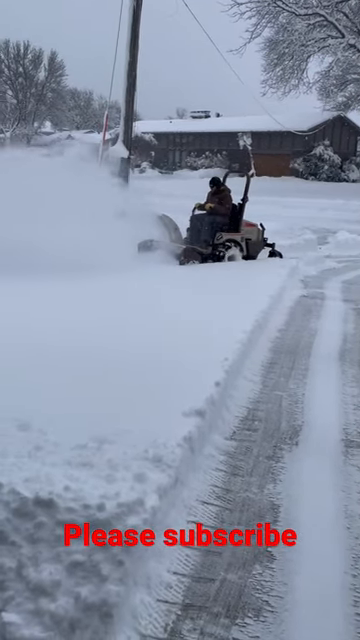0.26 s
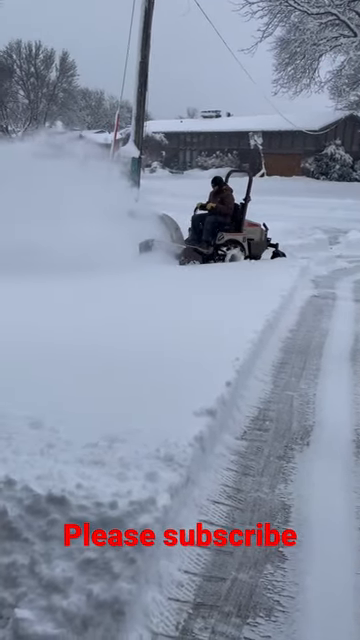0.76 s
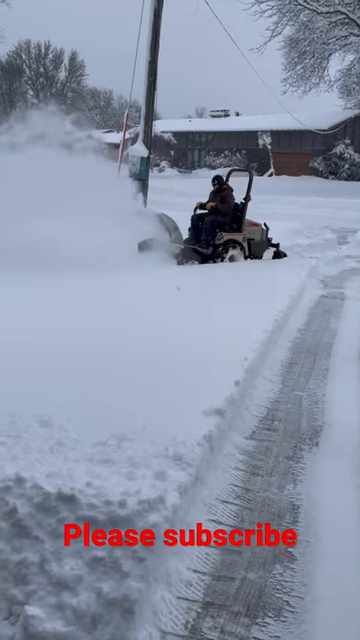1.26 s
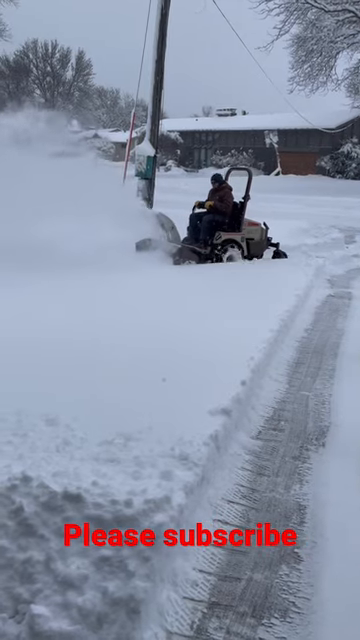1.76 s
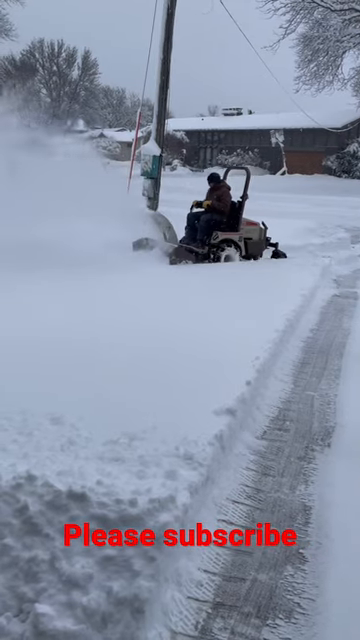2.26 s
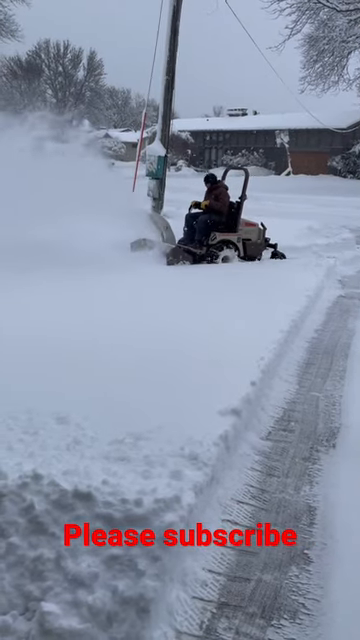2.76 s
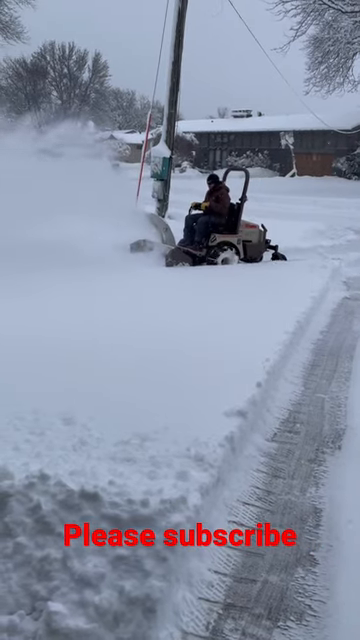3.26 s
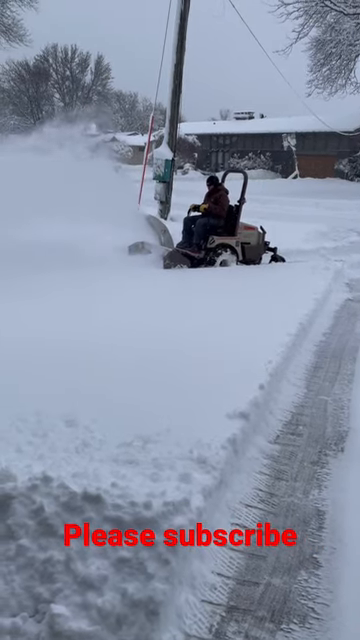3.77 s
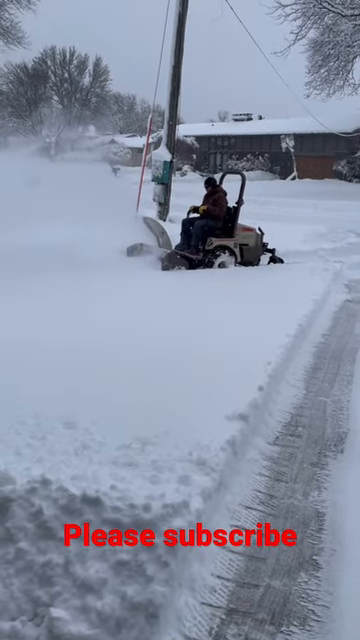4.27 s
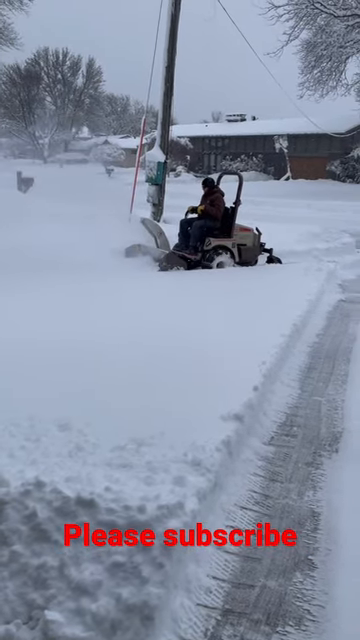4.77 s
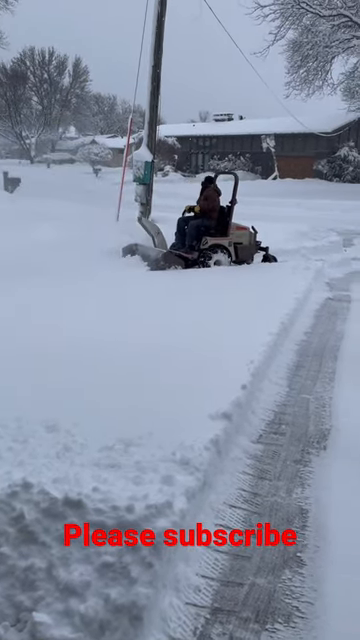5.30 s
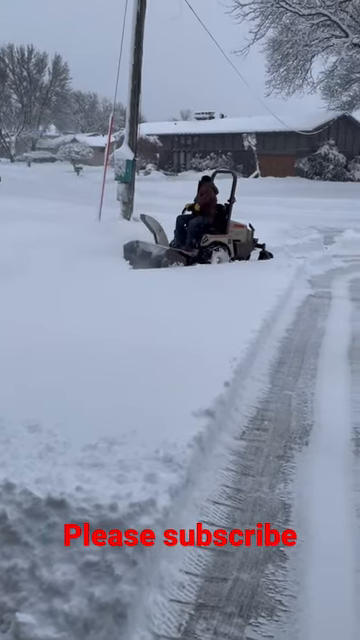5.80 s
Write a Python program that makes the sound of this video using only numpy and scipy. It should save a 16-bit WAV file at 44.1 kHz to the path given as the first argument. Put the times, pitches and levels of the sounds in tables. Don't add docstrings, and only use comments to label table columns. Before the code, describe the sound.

Continuous low diesel drone with fan hum and clatter, heard across an open snowy yard on a phone. At first there is a dense snow rush, gear whine and bright metallic ice rattle with irregular clinks. A throbbing low beat swells midway. After nearly four seconds the load falls off, leaving a cleaner, slightly higher engine hum, one tiny tick, and a faint returning hiss.

```python
import sys
import numpy as np
from scipy import signal
from scipy.fft import rfft, irfft, next_fast_len
from scipy.io import wavfile
from scipy.ndimage import uniform_filter1d

SR = 44100
rng = np.random.default_rng(int(sys.argv[2]) if len(sys.argv) > 2 else 0)


def linear_from_db(decibels):
    return 10 ** (np.asarray(decibels, float) / 20)


def transcribe(u):
    v = np.clip(np.atleast_2d(u).T, -1, 1)
    q = np.round(v * 32767).astype(np.int16)
    wavfile.write(sys.argv[1], SR, q)


N = 266364

# (time [s], load [0-1])
SNOW_LOAD = [
    (0, 1),
    (1, 0.93),
    (1.6, 0.89),
    (2.5, 0.98),
    (3, 0.71),
    (3.6, 0.98),
    (4.3, 0.18),
    (5.5, 0.18),
    (6.04, 0.44),
]
# (time [s], chute rattle level [dB])
ICE_RATTLE = [
    (0, -37),
    (.5, -37.5),
    (1.5, -41),
    (2.5, -40.5),
    (3.4, -41),
    (3.9, -39),
    (4.3, -62),
    (5, -71),
    (6.04, -53),
]
# (time [s], turned away [0-1])
HEADING = [
    (0, 0),
    (1.8, 0.14),
    (3.6, 0.62),
    (5.15, 0.83),
    (5.7, 0.25),
    (6.04, 0),
]
# (time [s], engine cycles [Hz])
ENGINE_SPEED = [(0, 29.15), (.6, 29.156), (.9, 29.133), (1.8, 29.131), (2.4, 29.17), (3, 29.285),
                (3.6, 29.29), (3.9, 29.6), (4.2, 29.73), (4.8, 29.66), (6.04, 29.58)]
# (time [s], impeller turns per engine cycle [ratio])
IMPELLER_RATIO = [
    (2.6, .6276),
    (3, .6288),
]
# (multiple of engine cycle [ratio], loaded level [dB], free level [dB])
ENGINE_ORDERS = [(1.996, -47, -63), (3, -27, -23), (4.01, -43, -43), (4.79, -49.5, -44.5), (6, -35, -39),
                 (7.02, -47.5, -57.5), (9.01, -45, -50), (11, -63, -62.5), (11.94, -43, -35.5),
                 (13.31, -44.5, -95), (13.92, -60, -53), (15.02, -48.5, -44), (16.23, -57, -34.5),
                 (17.98, -44.5, -61), (19.47, -49, -53), (20, -59, -52), (21.16, -43, -42.5),
                 (21.81, -38, -41.5), (23.13, -44, -51), (24.13, -47.5, -38.5), (25.1, -51.5, -49.5),
                 (26.7, -45, -75), (27.55, -42, -50.5), (29.4, -50, -39), (32.16, -43.5, -52.5),
                 (32.73, -66, -36), (40.07, -48.5, -47), (40.26, -59, -51), (70.4, -46.5, -55),
                 (84.4, -44.5, -53)]
# (multiple of impeller turn [ratio], loaded level [dB])
IMPELLER_ORDERS = [(3, -46), (4, -31), (5, -42), (6, -46), (8, -46.5), (10, -42), (11, -46), (12, -45),
                   (15, -50), (16, -53), (18, -45), (19, -46), (20, -43), (21, -42), (22, -41), (23, -43),
                   (24, -47), (25, -41), (26, -44), (27, -41), (28, -42), (34, -49), (60, -45), (90, -45)]
# (multiple of impeller turn [ratio], level around the ring [dB])
HOUSING_ORDERS = [(29, -14), (30, 1.5), (31, -3.5), (32, -10.5), (33, -17)]
# (multiple of fan turn [ratio], loaded level [dB], free level [dB])
FAN_ORDERS = [(2, -51, -59), (3, -47.5, -44), (4, -86, -47), (5, -41, -34), (7, -43, -38), (9, -54, -47),
              (10, -43, -41.5), (16, -44, -57)]
# (frequency [Hz], density [dB per Hz])
CLATTER_SPECTRUM = [(30, -79), (55, -55), (100, -60), (200, -73.5), (290, -72), (480, -59.5), (1200, -62),
                    (2100, -68.5), (2600, -67), (3400, -73.5), (3650, -76.5), (9800, -82.5), (12700, -95.5),
                    (15200, -95)]
# (frequency [Hz], density [dB per Hz])
RUSH_SPECTRUM = [(30, -86), (70, -52.5), (160, -59.5), (260, -70.5), (500, -64.5), (800, -64),
                 (1500, -82.5), (2500, -74.5), (3650, -86), (6000, -79), (9500, -82.5), (12700, -100),
                 (15300, -99)]
# (frequency [Hz], width [Hz], level [dB])
CHUTE_MODES = [(1637, 55, 1.5), (2555, 170, 3), (2666, 200, -4), (3308, 42, -0.5), (4435, 92, 0.5),
               (5980, 300, 0.5), (7840, 240, -26)]
# (frequency [Hz], width [Hz], level over rattle [dB], rise in packed snow [dB])
RING_MODES = [(4230, 54, 1.5, -5), (4995, 44, -1, -4), (5450, 82, -2, 7), (5726, 30, -1, 4)]
# (time [s], peak level [dB], place on the chute [-1 low to 1 high])
CLINKS = [(0.0268, -28, 0.66), (0.0882, -30, -1.3), (0.1521, -22.5, -.8), (0.2628, -42, -1),
          (0.2853, -40, -0.56), (0.4943, -27, .5), (0.5192, -30, .6), (0.5646, -36, .3), (0.6494, -29, 0),
          (0.7023, -19, -0.58), (0.7312, -25, -.2), (0.8086, -47, -1), (0.8455, -39, -.9),
          (0.9313, -26, -0.077), (1.2575, -48, -0.78), (2.0497, -35, -0.95), (2.2712, -32, -.4),
          (2.5346, -34, -.5), (2.6364, -40, -.6), (2.7107, -40, -.7), (2.9721, -26.5, -0.9),
          (3.0061, -31, -1), (3.0654, -33, -1.2), (3.1313, -31, -1), (3.2575, -38, -0.62),
          (3.2849, -29, -.6), (3.3972, -31, -.2), (3.5887, -35, .5)]
# (frequency [Hz], width [Hz], level [dB], slope [dB per place])
CLINK_MODES = [(5030, 38, -3, 2), (5460, 170, -12.5, 2), (4500, 150, 2, 2), (6050, 140, -5, 1)]
# (time [s], peak level [dB])
FLAKE_TICKS = [
    (1.5694, -40),
    (4.957, -28),
]
# (frequency [Hz], left lead [half turns])
PORT_LEAD = [(220, 0), (780, .22), (1120, -.06), (1720, -.1), (2000, 0), (3300, .3), (4400, .36), (5150, 0),
             (5900, .3), (6700, .75), (8950, 1.27), (9800, 1.72), (12500, 2.27), (13000, 2.72),
             (15400, 3.3)]
# (frequency [Hz], likeness [0-1])
PORT_LIKENESS = [(100, .9993), (350, .985), (600, .975), (1000, .62), (2000, .97), (2800, .82), (3500, .6),
                 (4700, .5), (5200, .9), (6300, .85), (7500, .95), (9300, .8), (11000, .95), (12600, .8),
                 (14300, .95)]
# (frequency [Hz], left minus right [dB])
PORT_BALANCE = [(60, -.4), (190, -1.4), (350, -1.2), (630, .8), (1000, 6), (1500, 3.5), (2030, 0),
                (3000, -1.5), (5000, .8), (6600, 0)]
# (frequency [Hz], depth [dB])
GATE_DEPTH = [(500, 40), (2000, 17), (5200, 12), (6500, 6), (15000, 6)]
GATE_FLOOR_DB = -84.5

FAN_RATIO_LOADED, FAN_RATIO_FREE = 2.4105, 2.408
GEAR_RATIO = 29.093
FIRING_START_TURNS, OCTAVE_START_TURNS, BLADE_START_TURNS, STRIKE_START_TURNS = .47, .65, .18, .47
FIRING_DB, FIRING_DB_PER_HZ, FIRING_TOP_DB, LOADED_HZ = -27.5, 11, -24, 29.14
OCTAVE_DB, OCTAVE_AWAY_DB = -32.5, -10
WHINE_DB, WHINE_AWAY_DB, WHINE_OCTAVE_DB, WHINE_OCTAVE_AWAY_DB = -33., -5., -39, 0
FAN_LOADED_DB, FAN_FREE_DB, FAN_AWAY_DB = -41.5, -36., 3.
CLATTER_DB, CLATTER_AWAY_DB = .5, -0.5
EMPTY_S, EMPTYING_S = 3.7, 0.37
WHINE_EMPTY_DB, WHINE_OCTAVE_EMPTY_DB, RING_EMPTY_DB = -12.5, -37, -13.5
RING_DB, MOUTH_PASSES_S, MOUTH_DB_PER_S2 = -31.5, 1.92, -2.5
THUMP_LOOSE_DB, THUMP_PACKED_DB = -42.5, -27.5
BANK_S, ENTER_S, HOLD_S, LEAVE_S, CRUST_LEAD_S = 0.59, 2.1, 0.82, 1.1, 0.49
SPRAY_S, SPRAY_DB = 0.052, 3

STRIDE = 32
FFT_SIZE = next_fast_len(N)
T = np.arange(N) / SR
F = np.fft.rfftfreq(FFT_SIZE, 1 / SR) + 1e-3


def over_hz(table, f=F):
    hz, value = np.transpose(table)
    return np.interp(np.log(f), np.log(hz), value)


def curve(table):
    return np.interp(T, *np.transpose(table))


def fine(slow):
    return np.interp(T, T[::STRIDE], slow)


def slow_amp(db, wander_db):
    return fine(linear_from_db(np.broadcast_to(db, N)[::STRIDE] + wander_db))


def walk(rate):
    hold = int(SR / rate / STRIDE)
    steps = len(T[::STRIDE])
    held = np.repeat(rng.standard_normal(steps // hold + 1), hold)
    return 1.38 * uniform_filter1d(uniform_filter1d(held, hold), hold)[:steps]


def tones(turns, multiples, levels_db, wander_db, slip, rate):
    out = np.zeros(N)
    for k, db in zip(multiples, levels_db):
        phase = 2 * np.pi * (k * turns + rng.random()) + fine(slip * walk(rate))
        out += slow_amp(db, wander_db * walk(rate)) * np.sqrt(2) * np.sin(phase)
    return out


def hiss(spectrum, shared_db, flicker_db, rate, gust_db):
    noise = rfft(rng.standard_normal(FFT_SIZE)) * linear_from_db(over_hz(spectrum)) * np.sqrt(SR / 2)
    out = np.zeros(N)
    place = 2 * np.log2(F / 30)
    gust = gust_db * walk(15.)
    for band in range(19):
        share = np.cos(np.pi / 2 * np.clip(place - band, -1, 1)) ** 2
        wander_db = flicker_db * walk(rate) + gust * (band / 18) ** 3
        out += slow_amp(shared_db, wander_db) * irfft(noise * share, FFT_SIZE)[:N]
    return out


def mode(blows, hz, width):
    pole = np.exp(-np.pi * width / SR)
    angle = 2 * np.pi * hz / SR
    return signal.lfilter([np.sin(angle)], [1, -2 * pole * np.cos(angle), pole ** 2], blows)


def flakes():
    s, peak_db = np.transpose(FLAKE_TICKS)
    blows = np.zeros(N)
    blows[(s * SR).astype(int)] = linear_from_db(peak_db + 4)
    return mode(blows, 11000., 4000.)


def fan(turns_per_sample, load, blade_db):
    ratio = FAN_RATIO_FREE + load * (FAN_RATIO_LOADED - FAN_RATIO_FREE)
    turns = np.cumsum(turns_per_sample * ratio)
    multiples = [row[0] for row in FAN_ORDERS]
    levels = [blade_db if k == 5 else free + load * (loaded - free) for k, loaded, free in FAN_ORDERS]
    return tones(turns, multiples, levels, 1.0, 0.087, 5.)


def engine(turns, load, firing_db, octave_db, clatter_db):
    rows = [row for row in ENGINE_ORDERS if round(row[0]) not in (3, 6, 12, 24)]
    multiples = [round(row[0]) for row in rows]
    levels = [free + load * (loaded - free) for _, loaded, free in rows]
    side_tones = tones(turns, multiples, levels, 2.0, 0.81, 4.08)
    firing = linear_from_db(firing_db) * np.sqrt(2) * np.sin(2 * np.pi * (3 * turns + FIRING_START_TURNS))
    firing += linear_from_db(octave_db) * np.sqrt(2) * np.sin(2 * np.pi * (6 * turns + OCTAVE_START_TURNS))
    puff_db = 0.89 * np.cos(6 * np.pi * turns) + 0.59 * np.cos(2 * np.pi * turns)
    shared_db = puff_db + clatter_db + fine(0.6 * walk(2.895))
    return firing + side_tones + hiss(CLATTER_SPECTRUM, shared_db, 0.8, 9., gust_db=1.5)


def clinks():
    s, peak_db, place = np.transpose(CLINKS)
    scatter = rng.standard_normal((len(s), len(CLINK_MODES)))
    out = np.zeros(N)
    for (hz, width, db, per_place_db), chance in zip(CLINK_MODES, scatter.T):
        blows = np.zeros(N)
        blows[(s * SR).astype(int)] = linear_from_db(peak_db + db + per_place_db * place + 2.2 * chance - 0.5)
        out += mode(blows, hz, width)
    return out


def spray():
    s, peak_db, _ = np.transpose(CLINKS)
    nearness = np.exp(-((T[::100] - s[:, None]) / SPRAY_S) ** 2)
    near = linear_from_db(peak_db - peak_db.max())[:, None] * nearness
    return SPRAY_DB * np.interp(T, T[::100], np.sqrt(near.sum(axis=0)))


def chute(rattle_db, packed):
    struck = np.flatnonzero(rng.random(N) < 800 / SR * slow_amp(0, 2.4 * walk(18.)))
    chance = rng.standard_normal((N // 10, 12))[:len(struck)]
    size_db = np.minimum(0.77 * rng.exponential(size=N // 10), 9.)
    size = linear_from_db(size_db)[:len(struck)] * chance[:, -1]
    sharp_db = rattle_db + spray() - 3.5
    modes = [(hz, width, db + rattle_db + fine(2.5 * walk(3.5))) for hz, width, db in CHUTE_MODES]
    for hz, width, db, packed_db in RING_MODES:
        modes.append((hz, width, db + packed_db * packed + sharp_db + fine(1.6 * walk(4.9))))
    out = np.zeros(N)
    for (hz, width, db), own in zip(modes, chance.T):
        blows = np.zeros(N)
        blows[struck] = size * linear_from_db(2.4 * own)
        ring = mode(mode(blows, hz, 2.2 * width), hz, 2.2 * width)
        out += slow_amp(db, 0) * ring / np.sqrt(uniform_filter1d(ring ** 2, SR // 3))
    return out


def thrower(turns, load, thump_db, ring_db, whine_db, whine_octave_db):
    shaft = np.cumsum(curve(IMPELLER_RATIO) * np.gradient(turns))
    thump = linear_from_db(thump_db) * np.sqrt(2) * np.sin(2 * np.pi * (4 * shaft + BLADE_START_TURNS))
    rows = [row for row in IMPELLER_ORDERS if row[0] != 4]
    load_db = 20 * np.log10(load + 0.039)
    levels = [thump_db - 10.5 if k == 8 else db + load_db for k, db in rows]
    ladder = tones(shaft, [row[0] for row in rows], levels, 1.2, .12, 4.)
    strike = 2 * np.pi * (shaft + STRIKE_START_TURNS)
    throb = sum(linear_from_db(db) * np.sin(k * strike) for k, db in HOUSING_ORDERS)
    ring = throb * np.sqrt(2) * slow_amp(ring_db, 1.0 * walk(7.44))
    whine = tones(GEAR_RATIO * turns, [1, 2], [whine_db + 0.87, whine_octave_db + 0.68], 0.92, 0.69, 12.)
    bite_db = 0.71 * np.cos(strike) + fine(0.4 * walk(4.9))
    rush = load * hiss(RUSH_SPECTRUM, bite_db, 1.56, 12.0, gust_db=1.3)
    return thump + ladder + ring + whine + rush


def ports(machine):
    edge = 8192
    wide = np.pad(machine, (edge, next_fast_len(N + 2 * edge) - N - edge), mode="reflect")
    f = np.fft.rfftfreq(len(wide), 1 / SR) + F[0]
    direct = rfft(wide)
    tail = rng.standard_normal(edge) * np.exp(-np.arange(edge) / (.05 * SR))
    scattered = direct * rfft(tail / np.sqrt(np.sum(tail ** 2)), len(wide))
    alike = over_hz(PORT_LIKENESS, f)
    shared = np.sqrt((1 + alike) / 2) * direct
    apart = np.sqrt((1 - alike) / 2) * scattered
    half = np.exp(.5j * np.pi * over_hz(PORT_LEAD, f)) * linear_from_db(over_hz(PORT_BALANCE, f) / 2)
    both = np.array([(shared + apart) * half, (shared - apart) / half])
    return irfft(both, len(wide))[:, edge:edge + N]


def stereo_gate(x):
    sum_difference = np.array([x[0] + x[1], x[0] - x[1]]) / 2
    f, _, z = signal.stft(sum_difference, SR, nperseg=2048, boundary="even")
    band = np.arange(len(f)) // 8
    power = np.add.reduceat(np.abs(z) ** 2, np.arange(0, len(f), 8), axis=1) / 8
    frame_db = 1.4 * rng.standard_normal(power.shape[2])
    band_db = 1.3 * rng.standard_normal(power.shape[1:])
    shift = linear_from_db(frame_db + band_db) ** 2
    margin = linear_from_db(np.interp(f[::8], *np.transpose(GATE_DEPTH)))[:, None] ** 2
    strong_enough = power * margin * shift > power[::-1]
    passed = strong_enough & (power * shift > linear_from_db(GATE_FLOOR_DB) ** 2)
    mid, side = signal.istft(z * passed[:, band], SR, nperseg=2048)[1][:, :N]
    return np.array([mid + side, mid - side])


def scene():
    hz, away = curve(ENGINE_SPEED), curve(HEADING)
    load = np.clip(curve(SNOW_LOAD), 0, 1.2)
    empty = np.clip((T - EMPTY_S) / EMPTYING_S, 0, 1)
    bank = np.cumsum([BANK_S, ENTER_S, HOLD_S, LEAVE_S]), [0, 1, 1, 0]
    packed = np.interp(T, *bank)
    crust = np.interp(T + CRUST_LEAD_S, *bank)
    firing_db = np.minimum(FIRING_DB + FIRING_DB_PER_HZ * (hz - LOADED_HZ), FIRING_TOP_DB)
    octave_db = OCTAVE_DB + OCTAVE_AWAY_DB * away
    clatter_db = CLATTER_DB + CLATTER_AWAY_DB * away
    thump_db = THUMP_LOOSE_DB + packed * (THUMP_PACKED_DB - THUMP_LOOSE_DB)
    mouth_db = MOUTH_DB_PER_S2 * (T - MOUTH_PASSES_S) ** 2
    ring_db = RING_DB + mouth_db * (1 - empty) + RING_EMPTY_DB * empty
    whine_db = WHINE_DB + WHINE_AWAY_DB * away + WHINE_EMPTY_DB * np.sqrt(empty)
    whine_octave_db = WHINE_OCTAVE_DB + WHINE_OCTAVE_AWAY_DB * away + WHINE_OCTAVE_EMPTY_DB * empty
    fan_db = FAN_LOADED_DB + empty * (FAN_FREE_DB - FAN_LOADED_DB) + FAN_AWAY_DB * away
    turns = np.cumsum(hz / SR)
    machine = fan(hz / SR, load, fan_db)
    machine += engine(turns, load, firing_db, octave_db, clatter_db)
    machine += clinks() + chute(curve(ICE_RATTLE) - 7.5, crust)
    machine += thrower(turns, load, thump_db, ring_db, whine_db, whine_octave_db)
    return ports(machine) + flakes()


def band_limit(x):
    return signal.sosfilt(signal.butter(12, 15650, fs=SR, output="sos"), x)


def record(dry):
    mix = stereo_gate(dry)
    return band_limit(mix)


dry = scene()
out = record(dry)
transcribe(out)
```